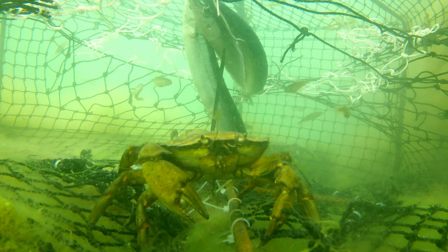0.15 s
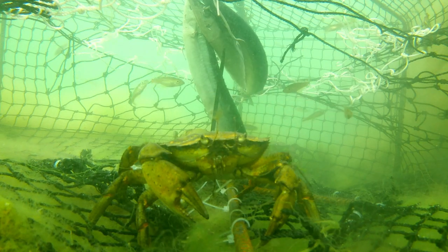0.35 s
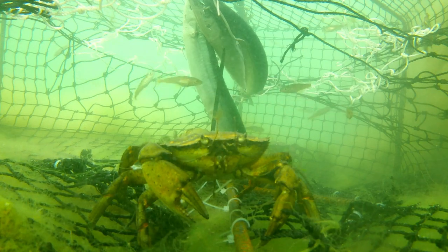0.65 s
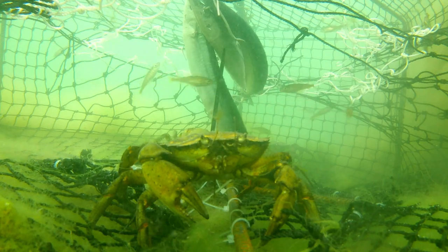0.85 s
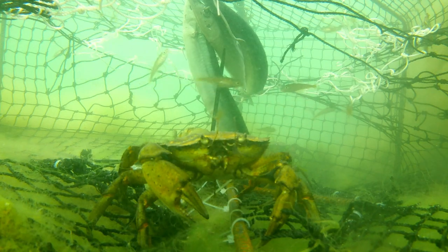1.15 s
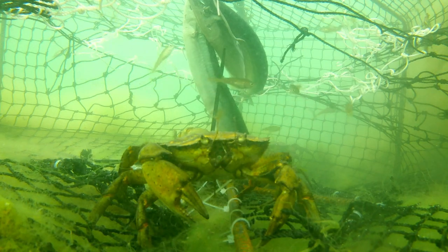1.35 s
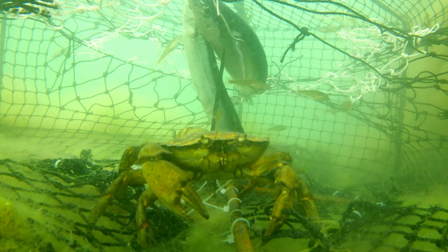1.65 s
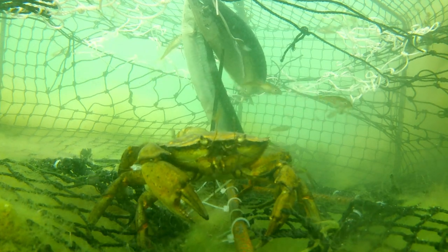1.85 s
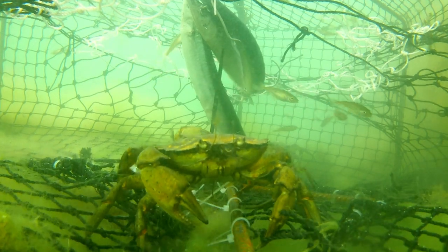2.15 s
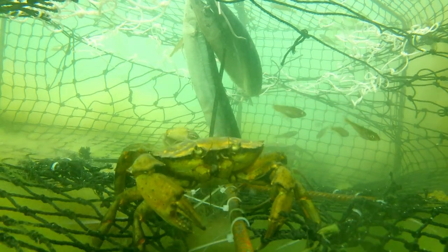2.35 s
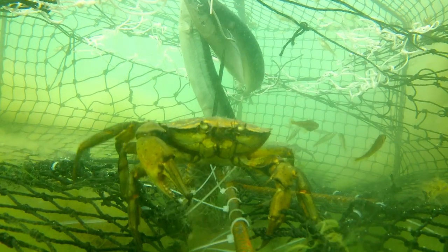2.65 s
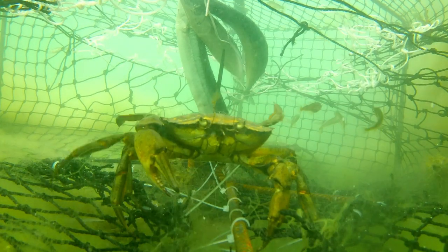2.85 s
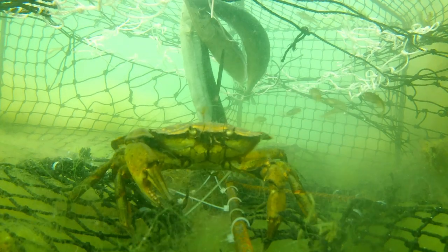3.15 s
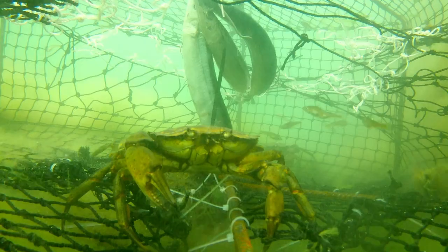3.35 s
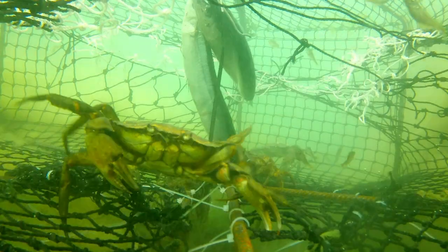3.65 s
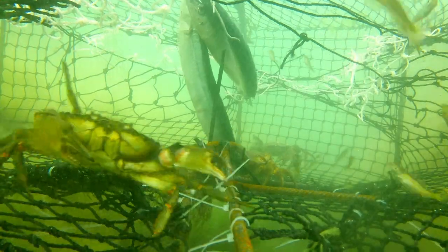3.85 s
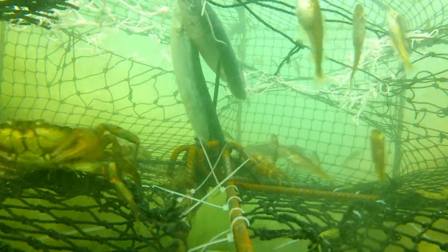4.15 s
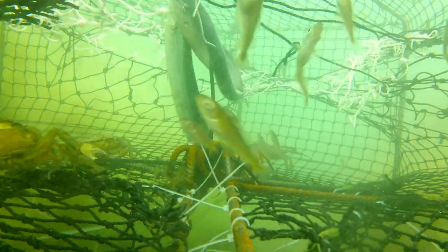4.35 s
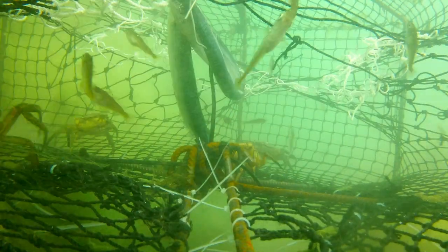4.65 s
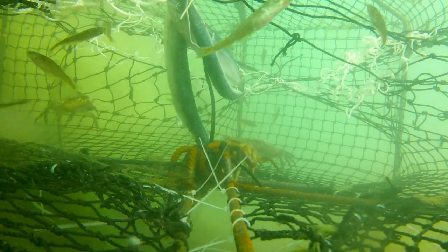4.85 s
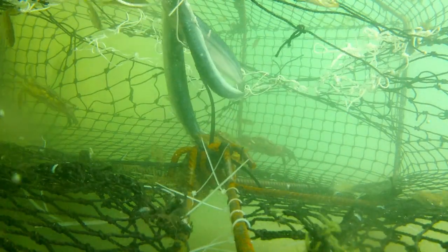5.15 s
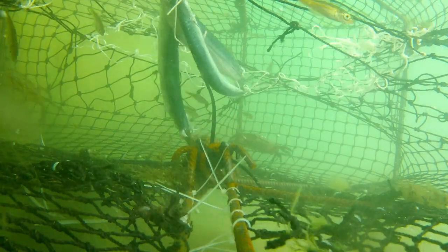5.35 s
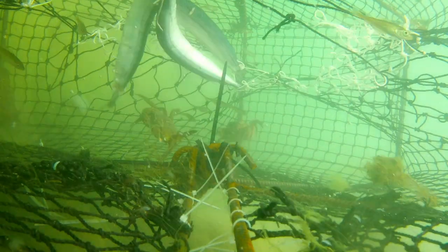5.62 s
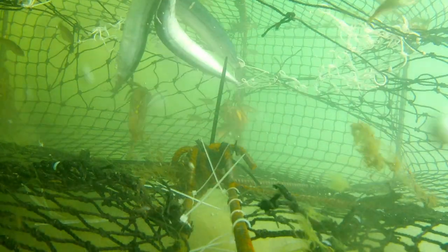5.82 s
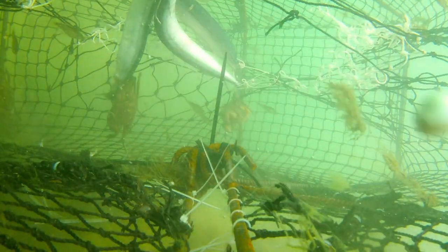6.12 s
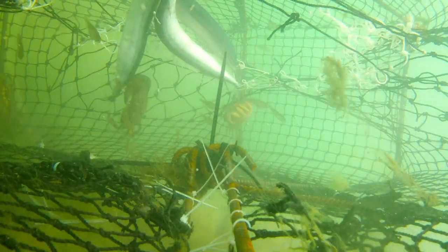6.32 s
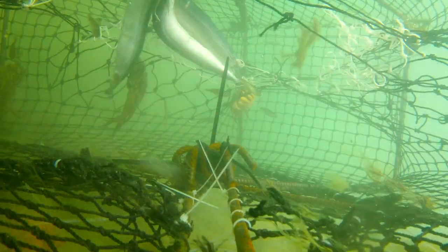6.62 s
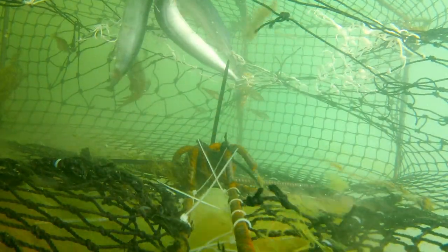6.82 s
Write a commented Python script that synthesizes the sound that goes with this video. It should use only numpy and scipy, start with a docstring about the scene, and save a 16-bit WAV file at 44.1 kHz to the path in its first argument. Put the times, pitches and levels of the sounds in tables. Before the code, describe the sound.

Heard from inside a sealed housing under water: faint low wash, a tiny click, then a hard hollow knock and a few softer ones as a crab and net trap touch the case. Later, legs scrabble against it in a dense burst of thuds, rasps and sharp clicks. It stops abruptly, leaving a short hum, stirring water and scattered knocks, ending with a double bump.

```python
"""First, water washing past a net trap, heard from inside a camera's sealed housing under water.
A crab and the jostled trap knock on the case, with no distance between blow and microphone housing; then
they scrabble hard against it for about a second and leave the trap's frame humming. Each contact is a dull
thud: a short push plus the case's low modes. Filtered noise makes the water; stick-slip jerks drive the
sliding legs; gritty scrapes and sharp clicks, from grains and quickly dying pings, come through on top."""
import sys
import numpy as np
from scipy import signal
from scipy.fft import rfft, irfft, next_fast_len
from scipy.io import wavfile
from scipy.ndimage import uniform_filter1d, map_coordinates

SR = 44100
rng = np.random.default_rng(int(sys.argv[2]) if len(sys.argv) > 2 else 0)


def put_to_file(sound):
    """Save the sound as 16-bit audio at rate SR, in the file named by the first command-line argument."""
    columns = np.atleast_2d(sound).T  # one column per channel
    safe = np.clip(columns, -1, 1)
    whole_steps = np.round(safe * 32767)
    wavfile.write(sys.argv[1], SR, whole_steps.astype(np.int16))


N = 307818
T = np.arange(N) / SR  # time in seconds

# Flow of the water, before and after the struggle. Each row: time in seconds, level in dB.
FLOW_BEFORE = [(0.0, -51), (0.69, -52.5), (1.67, -51.5), (1.83, -48), (2.36, -46), (2.58, -50.5),
               (3.33, -51.5), (3.51, -42.5), (3.75, -44)]
FLOW_AFTER = [(4.82, -48), (5.0, -43), (5.19, -49), (5.34, -45), (5.72, -42), (6.06, -48),
              (6.28, -47.5), (6.73, -40.5), (6.98, -39)]
# Water colours, low surge, wash and steady hiss. Each row: frequency in Hz, relative density in dB.
SURGE_SPECTRUM = [(15, -20.5), (30, -1.5), (55, -1), (90, -1.5), (140, -5.5), (220, -9.5), (400, -44),
                  (800, -99)]
WASH_SPECTRUM = [(80, -27.5), (170, -10.5), (290, 2.5), (400, 0), (520, 4), (640, -5), (800, -14),
                 (1100, -27.5), (2500, -39.5), (6000, -48)]
HISS_SPECTRUM = [(410, -26.5), (700, -2.5), (827, 1.5), (1040, -2), (1270, -4), (1630, -6.5), (1970, -10),
                 (7730, -28), (12000, -29), (15600, -43), (22000, -120)]
# Sharp clicks of shell and grit. Each row: start in seconds, crack level in dB, top of the crack in Hz,
# ping level in dB, ping pitch in Hz, ping t60 in seconds.
CLICKS = [(0.0666, -43, 4300, -45, 1670, 0.013), (1.848, -40.5, 3900, -44, 2080, 0.0072),
          (2.0712, -37.5, 4000, -41, 1530, 0.015), (2.2392, -38, 2480, -35.5, 1800, 0.0067),
          (2.3203, -48, 4500, -51, 3950, 0.015), (3.406, -42, 4300, -41, 1520, 0.012),
          (3.76, -31, 3280, -31.5, 1600, 0.02), (3.779, -40, 2400, -40, 2020, .014),
          (3.8187, -41, 4440, -36, 1740, 0.014), (3.866, -41, 4480, -51, 4200, .006),
          (3.951, -40, 4500, -53, 2770, 0.0087), (4.026, -38, 6240, -27, 1650, 0.012),
          (4.398, -23, 6440, -23, 4100, 0.0058), (4.41, -27, 6500, -27.5, 5660, 0.0061),
          (4.422, -20.5, 3800, -40, 2750, 0.0056), (4.491, -42, 5000, -32, 1500, 0.0089),
          (4.9353, -36.5, 4330, -32, 1610, 0.012), (5.1801, -34, 1960, -39, 1040, 0.041),
          (5.3822, -32.5, 5070, -30.5, 1660, 0.021), (5.387, -31, 4170, -36.5, 2030, 0.021),
          (5.3967, -45, 3000, -36, 1356, 0.023), (5.458, -37.5, 6060, -40, 5360, 0.0058),
          (5.5428, -31.5, 5050, -39, 1420, 0.022), (5.549, -50, 5300, -47, 3200, .008),
          (5.5803, -40.5, 6800, -41, 5940, 0.0047), (5.625, -46, 2700, -27, 2150, 0.0053),
          (5.738, -41, 4300, -51, 3900, 0.013), (6.575, -35.5, 6500, -35, 5540, 0.005),
          (6.586, -28, 2700, -30.5, 2310, 0.021), (6.5967, -33, 2200, -24, 1850, 0.014),
          (6.598, -50, 3800, -44, 3220, 0.015), (6.604, -42, 6300, -43, 5500, 0.0049),
          (6.628, -52, 4200, -50, 3650, 0.014), (6.636, -48, 3500, -48, 2450, 0.012),
          (6.649, -39, 3800, -37, 3210, 0.018), (6.684, -42.5, 3800, -44, 3150, .014),
          (6.7225, -48, 4500, -46, 3930, 0.0055), (6.7253, -28.5, 3260, -41, 2740, 0.026),
          (6.764, -35, 4230, -37, 1170, 0.021)]
# High resonances of the stiff wall. Each row: pitch in Hz, width in Hz, relative level in dB.
WALL_MODES = [(1245, 50, 4), (1362, 65, 6.5), (1567, 45, 2.5), (1727, 55, 5), (2018, 36, 3.5),
              (2350, 55, -23), (2640, 38, -10.5), (2875, 32, -10.5), (2970, 53, -9.5), (3650, 70, -12),
              (3870, 37, -5), (4270, 37, -6), (4600, 150, -17.5), (5600, 220, -21)]
# Knocks on the case. Each row: crest in seconds, peak level in dB before the top is cut, push pitch in Hz.
KNOCKS = [(1.7851, -8.5, 506), (1.8494, -25, 670), (1.873, -17, 435), (1.9058, -18, 445),
          (1.9212, -26, 300), (1.934, -33, 370), (1.955, -41, 623), (2.0715, -28, 670), (2.0757, -22, 470),
          (2.084, -27, 434), (2.1786, -36, 500), (2.279, -36, 506), (2.289, -30.5, 470), (2.5044, -40, 402),
          (2.5534, -46, 376), (2.9678, -31, 390), (2.974, -32, 430), (3.0721, -31, 483),
          (3.352, -19.5, 320), (3.4082, -22, 470), (3.4428, -23.5, 437), (3.5166, -16, 424),
          (3.5768, -27, 490), (3.8855, -22.5, 393), (4.3865, -10.5, 540), (4.5295, -10.5, 500),
          (4.6935, -9, 465), (5.0364, -27.5, 547), (5.1141, -23.5, 470), (5.1469, -25, 584),
          (5.1542, -16.5, 335), (5.1818, -19.5, 288), (5.3835, -25, 576), (5.5445, -30, 484),
          (5.5509, -26.5, 445), (5.7405, -19, 330), (5.7495, -28, 307), (5.862, -30, 510),
          (5.915, -29, 520), (6.5865, -30.5, 730), (6.5968, -31, 690), (6.7738, -17.5, 423),
          (6.782, -15, 478)]
# Low modes of the case. Each row: pitch in Hz, relative level in dB, undamped t60 in seconds.
CASE_MODES = [(60.7, -18, 0.2), (99, -14.5, 0.072), (141.7, -4.5, 0.16), (185, -4.5, 0.064),
              (265.7, -2.5, 0.066), (298.7, 3, 0.19), (341, -4, 0.085), (392, -1, 0.082), (503.5, -5, 0.1),
              (548.2, 0.5, 0.11), (602, -0.5, 0.073), (752, -6.5, 0.05), (855, -9.5, 0.07)]
# Colour of the crackling hiss. Each row: frequency in Hz, relative density in dB.
FIZZ_SPECTRUM = [(2500, -22), (5000, -3), (7000, 3), (9000, 7.5), (10500, 9.5), (11800, -4)]
# Lurches of the whole case. Each row: crest in seconds, peak level in dB, pitch in Hz.
LURCHES = [(1.88, -29, 122), (1.927, -36, 118), (2.196, -34, 105), (3.319, -31, 87.4), (3.584, -28.5, 106),
           (3.852, -30, 90.5), (3.93, -22.5, 113), (4.087, -14, 103), (4.389, -11.5, 135),
           (4.412, -10.5, 159), (4.477, -15.5, 74.5), (4.552, -14, 135), (4.703, -13, 140),
           (4.736, -18, 123), (5.746, -27.5, 129), (6.777, -20.5, 101), (6.802, -26, 93)]
# Short rubs of the net. Each row: middle in seconds, length in seconds, gritty level in dB, drumming in dB.
RUBS = [(1.884, 0.012, -62, -32.5), (1.922, 0.014, -64, -37), (2.083, 0.011, -60, -34),
        (2.279, 0.0098, -59, -38), (2.537, 0.038, -65, -39), (3.374, 0.057, -67, -41.5),
        (3.44, 0.0066, -55, -35.5), (3.519, 0.0069, -50, -39.5), (3.648, 0.052, -60, -40.5),
        (3.773, 0.04, -62, -42), (4.273, 0.018, -52, -39), (4.302, 0.014, -42, -43),
        (4.424, 0.02, -47.5, -27), (5.181, 0.017, -57.5, -36), (5.548, 0.01, -52, -30.5),
        (5.752, 0.025, -66, -29.5), (6.386, 0.05, -64, -44), (6.598, 0.021, -53, -37),
        (6.773, 0.011, -52.5, -31.5)]
# Legs sliding along the case. Each row: start in seconds, length in seconds,
# rasp level in dB before its trim, judder level in dB.
STROKES = [(2.271, 0.015, -58, -39.5), (3.613, 0.055, -56.5, -44), (3.757, 0.04, -56, -40),
           (3.816, 0.012, -47, -38), (3.872, 0.092, -55.5, -40.5), (4.003, 0.04, -55, -30.5),
           (4.063, 0.021, -57.5, -33), (4.163, 0.07, -52, -28.5), (4.24, 0.048, -42.5, -23),
           (4.297, 0.025, -40, -30.5), (4.328, 0.029, -37.5, -20.5), (4.371, 0.016, -37.5, -18),
           (4.389, 0.04, -41, -24), (4.445, 0.056, -49, -23.5), (4.523, 0.016, -46, -24),
           (4.547, 0.018, -41, -27), (4.567, 0.012, -44.5, -26), (4.64, 0.015, -45, -26),
           (4.656, 0.02, -46.5, -27.5), (4.684, 0.023, -46, -26.5), (5.268, 0.03, -54, -44),
           (5.362, 0.0135, -50, -38.5), (5.38, 0.031, -46, -42.5), (5.541, 0.014, -49.5, -37.5),
           (5.72, 0.024, -51, -38)]
# Long shoves by the crab's kicks and the swinging trap. Each row: crest in seconds,
# peak level in dB before the top is cut, push pitch in Hz, level of the drumming burst in dB.
KICKS = [(3.874, -30, 290, -48), (3.915, -19.5, 317, -22.5), (3.928, -20, 310, -35),
         (4.009, -17.5, 360, -24), (4.03, -19, 390, -24.5), (4.075, -18.5, 308, -21.5),
         (4.097, -17.5, 292, -34), (4.113, -19, 282, -37), (4.14, -19, 324, -26), (4.177, -10, 296, -20),
         (4.2, -11, 339, -24.5), (4.226, -18.5, 383, -27), (4.28, -21, 620, -31), (4.312, -10, 302, -19.5),
         (4.349, -12, 280, -18.5), (4.381, -9.5, 302, -13.5), (4.412, -15, 537, -15),
         (4.435, -14, 557, -15.5), (4.476, -17.5, 620, -26), (4.531, -15.5, 370, -19),
         (4.55, -8.5, 281, -16), (4.578, -21.5, 295, -32), (4.666, -10.5, 285, -15.5),
         (4.701, -10.5, 311, -16), (6.378, -30, 573, -56), (6.399, -30, 596, -47), (6.769, -12.5, 554, -42)]

# water: calm flow; wash over the flow; calm surge; dB of surge per dB of flow
CALM_DB, WASH_DB, SURGE_DB, SURGE_GROWS = -52.5, 0.12, -47, 0.48
STIR_WASH_DB, STIR_SURGE_DB = -9, -10.5  # water stirred up by the crab, relative to its effort
# contact time in cycles of the push, and share of ringing
KNOCK_CYCLES, KNOCK_RING, KICK_CYCLES, KICK_RING = 0.48, 0.29, 1.52, 0.41
FIRM_DB, LINGER = -9, 0.13  # level of a firm blow; softer blows linger, in dB of width per dB
# the struggle builds to one climax, then slackens
CLIMAX_S, CLIMAX_DB, BUILD_DB_PER_S, SLACKEN_DB_PER_S = 4.434, -20, 25, 39
# the crab takes hold: when, within how long, and how much weaker it is before
GRAB_S, GRAB_RISE_S, LOOSE_DB = 3.87, 0.0075, 11
LET_GO_S, LET_GO_DB_PER_S = 4.73, 167  # the crab lets go: when, and the fade this adds to the slackening
# a kick's drumming starts ahead of the shove, swells and dies
KICK_LEAD_S, KICK_ATTACK_S, KICK_T60_S = 0.007, 0.0068, 0.16
GRIT_DB, GRIT_GROWS = -51.5, 1  # leg grit at the climax's effort, and its dB per dB of effort
# stick and slip: typical slips a second, life of a slip; how fast a leg bites, and dies away as it lifts
SLIP_HZ, SLIP_S, BITE_S, LIFT_T60_S = 115, 0.0043, 0.0047, 0.031
HUM_S, HUM_HZ, HUM_DB, HUM_T60_S = 4.69, 481.5, -25.5, 0.7  # the humming rod
BASS_HZ, TOP_HZ = 28, 12130  # the microphone's bass roll-off and upper band limit


def amp(db):
    """Decibels to gain."""
    return 10 ** (np.asarray(db) / 20)


def unit(x):
    """Scaled to rms 1."""
    return x / np.sqrt(np.mean(x ** 2) + 1e-20)


def wobble(rate):
    """A smooth random curve, rate knots a second."""
    return map_coordinates(rng.standard_normal(int(N * rate / SR) + 4), [T * rate])


def filtered(x, response):
    """x times a response of frequency."""
    m = next_fast_len(len(x) + SR // 10)
    return irfft(rfft(x, m) * response(np.fft.rfftfreq(m, 1 / SR)), m)[:len(x)]


def coloured(x, points):
    """x shaped by (Hz, dB) points, at rms 1."""
    f, db = np.transpose(points)
    return unit(filtered(x, lambda hz: amp(np.interp(np.log(hz + 1), np.log(f), db))))


def muffled(x, edge_hz, order):
    """Causal low-pass."""
    return signal.sosfilt(signal.butter(order, edge_hz, fs=SR, output="sos"), x)


def resonant(x, modes):
    """x through a sum of (Hz, width, dB) resonances."""
    def response(f):
        return sum(amp(db) * 1j * f * w / (c * c - f * f + 1j * f * w) for c, w, db in modes)
    return filtered(x, response)


def grains(rate, spread_db):
    """Randomly timed impulses of uneven size, rate a second on average."""
    hits = rng.random(N) < rate / SR
    signs = rng.choice([-1, 1], N)
    return hits * signs * amp(spread_db * np.clip(rng.standard_normal(N), -2, 2))


def add(track, s, sound):
    """Mix a sound in at time s."""
    part = track[round(s * SR):][:len(sound)]
    part += sound[:len(part)]


def water(effort):
    """A low surge and an eddying wash follow the flow and the crab's effort, over a faint steady hiss."""
    s, db = np.transpose(FLOW_BEFORE + FLOW_AFTER)
    flow_db = np.interp(T, s, db)
    calm_surge = amp(SURGE_DB + SURGE_GROWS * (flow_db - CALM_DB))
    # flow and stirring add in power
    surge_gain = np.hypot(calm_surge, amp(STIR_SURGE_DB) * effort)
    wash_gain = np.hypot(amp(WASH_DB + flow_db), amp(STIR_WASH_DB) * effort)
    surge = surge_gain * amp(0.97 * wobble(11.0)) * coloured(rng.standard_normal(N), SURGE_SPECTRUM)
    eddies = unit(grains(rate=350, spread_db=3.0)) + 1.18 * rng.standard_normal(N)
    wash = wash_gain * amp(2.45 * wobble(17)) * coloured(eddies, WASH_SPECTRUM)
    hiss = amp(-63.0) * coloured(rng.standard_normal(N), HISS_SPECTRUM)
    return surge + wash + hiss


def clicks(crack_t60=0.0088, rise=0.0007, wall_db=-6, lift_per_s=6):
    """A hard snap is a broad crack and a quickly dying pitch that lifts a little; the wall answers."""
    out, t = np.zeros(N), np.arange(SR // 12) / SR
    band = signal.butter(1, [400, 1600], "band", fs=SR, output="sos")
    onset = 1 - np.exp(-(t / rise) ** 2)
    for s, crack_db, top_hz, ping_db, hz, t60 in CLICKS:
        noise = signal.sosfilt(band, rng.standard_normal(len(t)))
        crack = unit(muffled(noise, edge_hz=top_hz, order=8)) * amp(crack_db - 60 * t / crack_t60)
        ping = np.sin(2 * np.pi * hz * t * (1 + lift_per_s * t / 2)) * amp(ping_db - 60 * t / t60)
        add(out, s - rise, (ping + crack) * onset)
    return out + amp(wall_db) * resonant(out, WALL_MODES)


def push(age, hz, width):
    """A water-damped shove: a cosine under a bell centred on its crest."""
    return -np.cos(2 * np.pi * hz * age) * np.exp(-.5 * (age / width) ** 2)


def case_ring(scatter_db):
    """The case's modes, at random strengths as if touched at varying spots."""
    t = np.arange(SR // 4) / SR
    hz, db, t60 = np.transpose(CASE_MODES)[:, :, None]
    size = amp(db + scatter_db * rng.standard_normal(hz.shape)) * rng.choice([-1, 1], hz.shape)
    return np.sum(size * np.sin(2 * np.pi * hz * t) * 1000 ** (-t / t60), axis=0)


def blows(rows, cycles, share, damping_t60, ring_hz, edge_hz):
    """Each blow is one short push, which sets the nearest modes of the case ringing."""
    lead = .012  # seconds kept ahead of the crest
    out, age = np.zeros(N), np.arange(SR // 6) / SR - lead
    for s, db, hz, *_ in rows:
        shove = push(age, hz, cycles / hz * amp(LINGER * (FIRM_DB - db)))
        ring = signal.fftconvolve(shove, case_ring(scatter_db=2.0))[:len(age)]
        ring = muffled(ring, ring_hz, order=4)
        # the modes swell behind the push and are damped by whatever leans on the case
        ring *= np.clip(age / 0.0021, 0, 1) * amp(-60 * age / damping_t60)
        blow = (1 - share) * shove + share * ring / np.abs(ring).max()
        add(out, s - lead, amp(db) * blow / np.abs(blow).max())
    return filtered(out, lambda hz: 1 / (1 + (hz / edge_hz) ** 14))


def knocks():
    """The trap and the crab's shell strike the case briefly."""
    return blows(KNOCKS, KNOCK_CYCLES, KNOCK_RING, damping_t60=0.085, ring_hz=750, edge_hz=1900)


def spit(length=0.025, db=-55):
    """A bright spit of hiss tops the first hard knock."""
    hiss = coloured(rng.standard_normal(N), [(3000, 0.5), (7000, -4.5), (8800, 6.5), (12000, 1.5)])
    return amp(db) * np.exp(-2 * ((T - KNOCKS[0][0]) / length) ** 2) * hiss


def fizz(motion, gain_db=-45, knee_db=-42):
    """A thin crackling hiss swells whenever the case shakes hard."""
    shake = np.sqrt(np.abs(uniform_filter1d(motion ** 2, size=900)))  # rms over about 20 ms
    sparkle = unit(grains(rate=900, spread_db=13.5)) + rng.standard_normal(N)
    # below the knee the hiss falls away faster than the shaking
    return amp(gain_db) * shake ** 2 / (shake + amp(knee_db)) * coloured(sparkle, FIZZ_SPECTRUM)


def lurches(width=0.0063):
    """Heavy shoves rock the whole case on its mount."""
    out, age = np.zeros(N), np.arange(-SR // 20, SR // 20) / SR
    for s, db, hz in LURCHES:
        add(out, s + age[0], amp(db) * push(age, hz, width))
    return out


def rub_gain(column):
    """The rubs of the net as smooth swells, at the levels of one column."""
    return sum(amp(rub[column]) * np.exp(-2 * ((T - rub[0]) / rub[1]) ** 2) for rub in RUBS)


def swell(start, attack, t60):
    """Gain that rises quickly at start and dies away."""
    age = np.maximum(T - start, 0)
    return np.minimum(age / attack, 1) * amp(-60 * np.maximum(age - attack, 0) / t60)


def struggle():
    """The crab's effort as a gain: a long build and a quicker slackening, with a burst at every kick."""
    build_db = CLIMAX_DB - BUILD_DB_PER_S * np.maximum(CLIMAX_S - T, 0)
    build_db -= SLACKEN_DB_PER_S * np.maximum(T - CLIMAX_S, 0)
    build_db -= LOOSE_DB * np.clip((GRAB_S - T) / GRAB_RISE_S, 0, 1)
    build_db -= LET_GO_DB_PER_S * np.maximum(T - LET_GO_S, 0)
    burst_power = sum((amp(drum_db) * swell(s - KICK_LEAD_S, KICK_ATTACK_S, KICK_T60_S)) ** 2
                      for s, _, _, drum_db in KICKS)
    return np.sqrt(amp(build_db) ** 2 + burst_power)


def drumming(low_hz, high_hz, steady_s=0.031):
    """Four crowds of contacts, each at its own spot, ring the case within a band at an evened-out level."""
    crowd = sum(signal.fftconvolve(grains(rate=82, spread_db=4.5), case_ring(scatter_db=2.5))[:N]
                for _ in range(4))
    crowd = muffled(crowd, high_hz, order=20)
    crowd = unit(filtered(crowd, lambda hz: 1 / (1 + (low_hz / (hz + 1)) ** 8)))
    power = np.abs(uniform_filter1d(crowd ** 2, size=int(steady_s * SR)))
    return crowd / np.sqrt(power + 1e-4)


def scrabble(effort, lumpy_db=-0.5):
    """Legs and mesh drum on the case, in lumps."""
    legs = amp(lumpy_db * wobble(35)) * effort
    return (legs + rub_gain(column=3)) * drumming(low_hz=30, high_hz=891)


def grit(rate, rough_db, jerks=1.0, low_hz=1040, high_hz=6500, shift_db=3.5):
    """Dense tiny slips, in clumps, ring the wall; its resonances trade strength as the contact slides."""
    slips = unit(grains(rate=rate, spread_db=4.5)) + 0.63 * rng.standard_normal(N)
    band = lambda hz: 1 / (1 + (low_hz / (hz + 1)) ** 14) / (1 + (hz / high_hz) ** 14)
    force = filtered(slips * jerks * amp(rough_db * wobble(60)), band)
    # three interleaved groups of wall modes wander in level separately
    return unit(sum(amp(shift_db * wobble(25)) * resonant(force, WALL_MODES[k::3]) for k in range(3)))


def scrapes(effort):
    """Sliding legs grate louder the harder they push; the soft net rubs more dully."""
    net = unit(muffled(grit(rate=3300, rough_db=-3.0), edge_hz=3300, order=2))
    leg_gain = amp(GRIT_DB) * (effort / amp(CLIMAX_DB)) ** GRIT_GROWS
    return leg_gain * grit(rate=410, rough_db=3.0) + rub_gain(column=2) * net


def strokes(rasp_trim_db=-3.0, uneven_db=3.0, sliding=0.92):
    """A leg bites and slides in uneven jerks, rasping the wall while the case's upper modes judder."""
    slip_count = np.floor(np.cumsum(SLIP_HZ * amp(uneven_db * wobble(90))) / SR)
    slips = np.diff(slip_count, prepend=0)
    # each slip dies away exponentially, over a steady slide
    jerks = sliding + unit(signal.lfilter([1], [1, -np.exp(-1 / (SLIP_S * SR))], slips))
    rasp, judder = np.zeros((2, N))
    for s, length, rasp_db, judder_db in STROKES:
        lift = amp(-60 * np.maximum(T - s - length, 0) / LIFT_T60_S)
        contact = np.clip((T - s) / BITE_S, 0, 1) * lift
        rasp += amp(rasp_db) * contact
        judder += amp(judder_db) * contact
    rasping = amp(rasp_trim_db) * rasp * grit(rate=1000, rough_db=1.6, jerks=jerks, high_hz=4240)
    return rasping + judder * drumming(low_hz=492, high_hz=916, steady_s=0.018)


def kicks():
    """A kick leans on the case for longer, so its thud is rounder."""
    return blows(KICKS, KICK_CYCLES, KICK_RING, damping_t60=0.14, ring_hz=750, edge_hz=910)


def frame_ring():
    """The last hard blow of the struggle leaves a rod of the trap's frame humming at one dying pitch."""
    age = np.maximum(T - HUM_S, 0)
    return amp(HUM_DB - 60 * age / HUM_T60_S) * np.sin(2 * np.pi * HUM_HZ * age)


def scene():
    """Everything reaches one microphone inside the case."""
    effort = struggle()
    thuds = knocks() + lurches() + scrabble(effort) + strokes() + kicks()
    mix = water(effort) + clicks() + thuds + spit() + fizz(thuds) + scrapes(effort) + frame_ring()
    return mix[None]


def record(dry):
    """The microphone thins the deepest bass, and nothing passes above the camera's band limit."""
    bass = lambda hz: hz ** 2 / np.hypot(hz ** 2, BASS_HZ ** 2)
    return np.array([filtered(channel, lambda hz: bass(hz) * (hz < TOP_HZ)) for channel in dry])


dry = scene()
out = record(dry)
put_to_file(out)
```